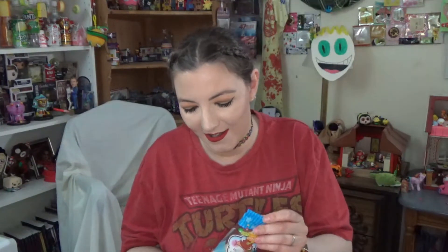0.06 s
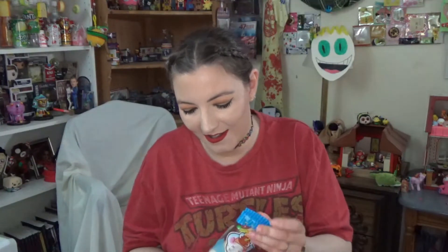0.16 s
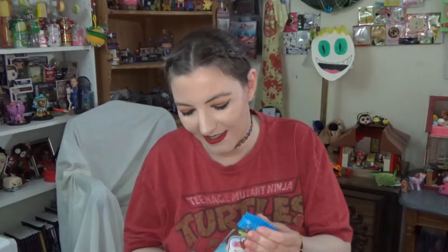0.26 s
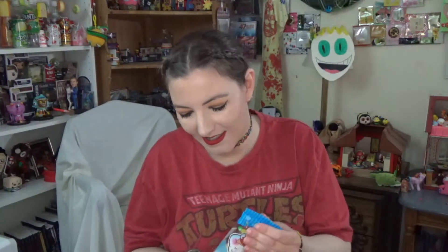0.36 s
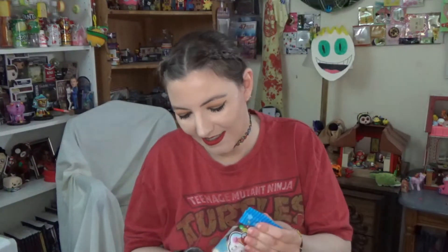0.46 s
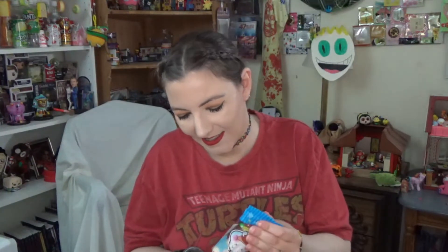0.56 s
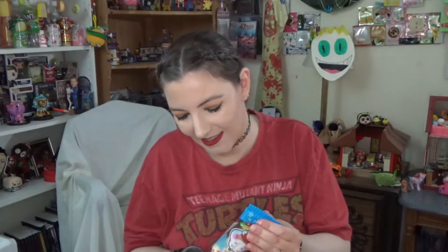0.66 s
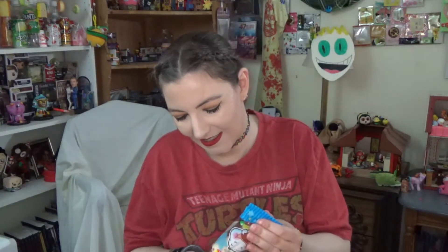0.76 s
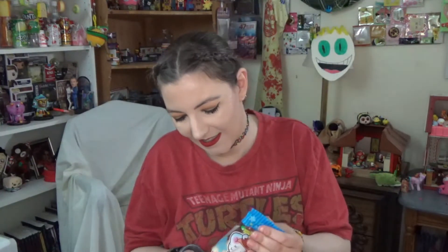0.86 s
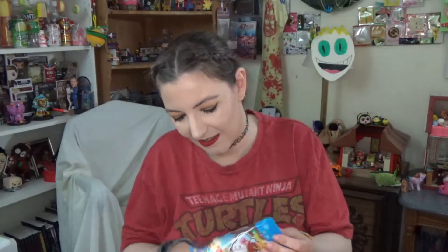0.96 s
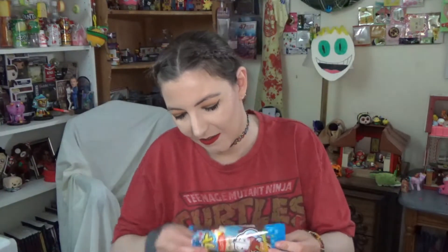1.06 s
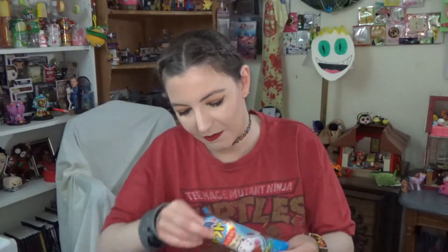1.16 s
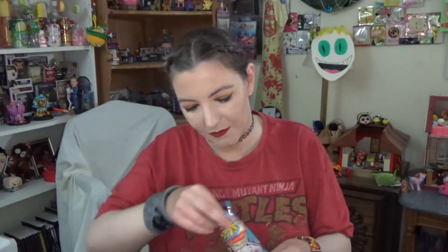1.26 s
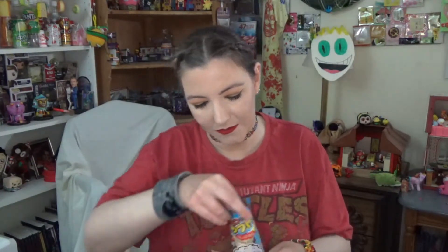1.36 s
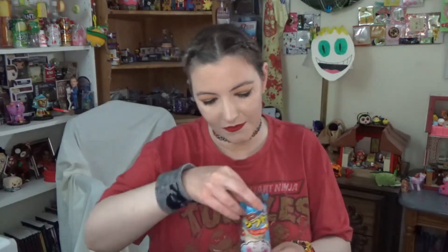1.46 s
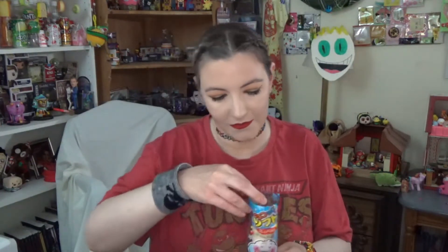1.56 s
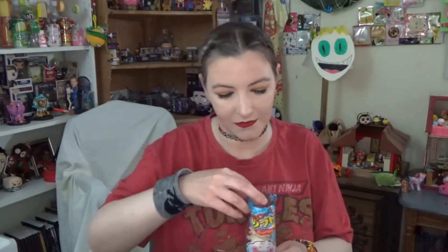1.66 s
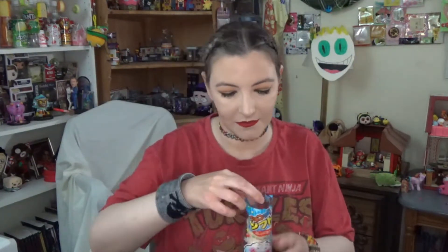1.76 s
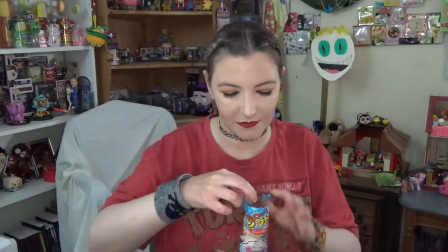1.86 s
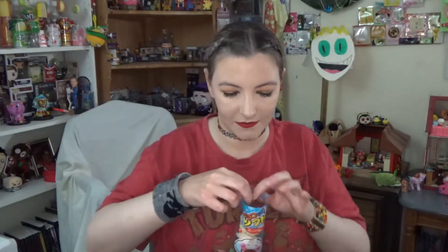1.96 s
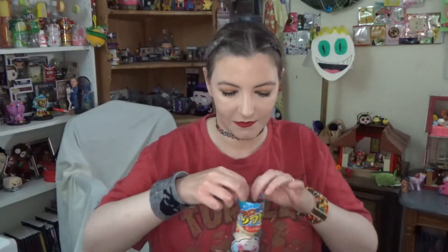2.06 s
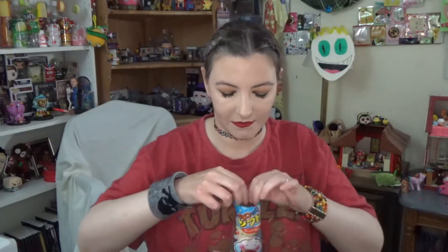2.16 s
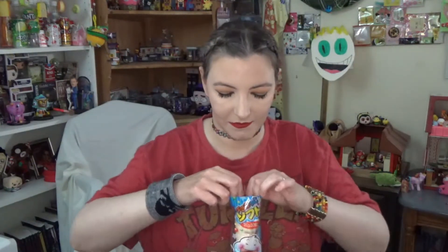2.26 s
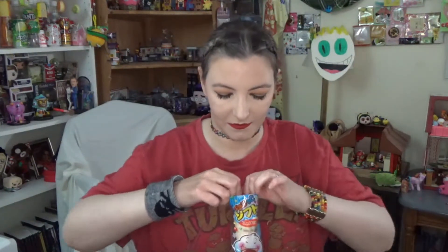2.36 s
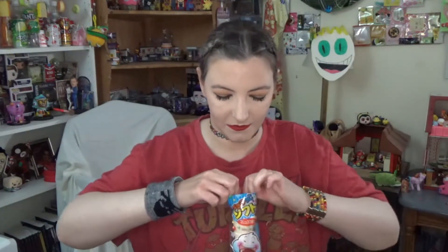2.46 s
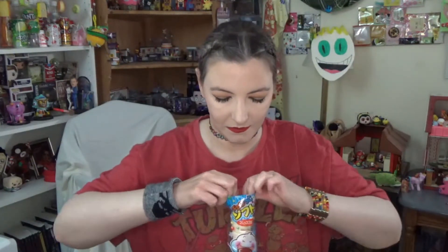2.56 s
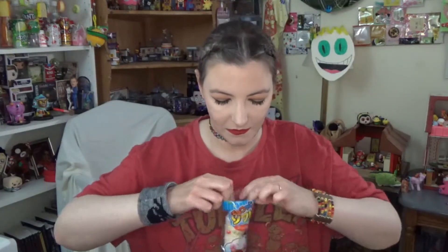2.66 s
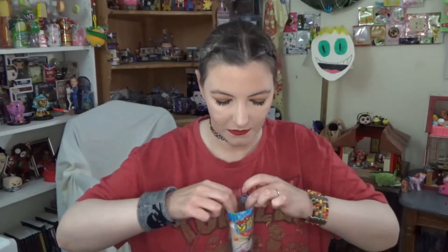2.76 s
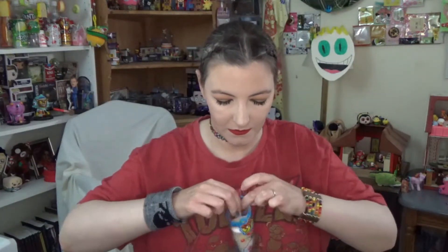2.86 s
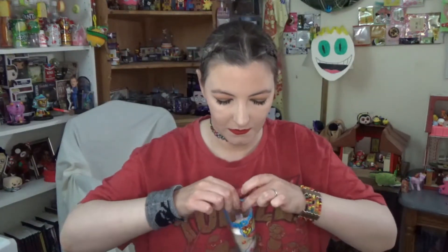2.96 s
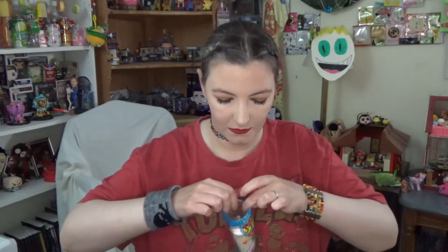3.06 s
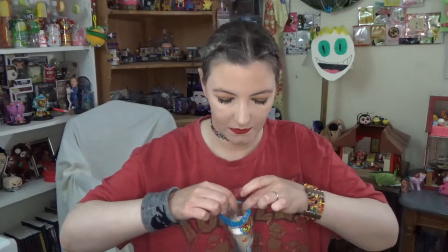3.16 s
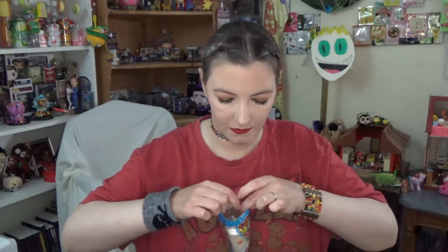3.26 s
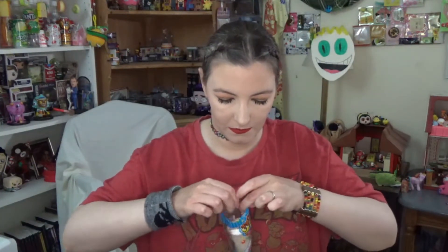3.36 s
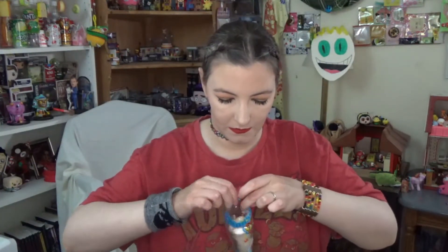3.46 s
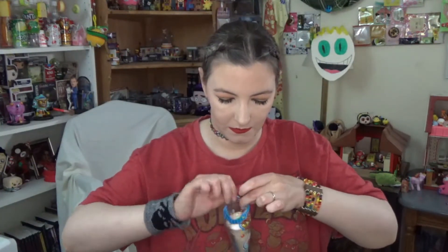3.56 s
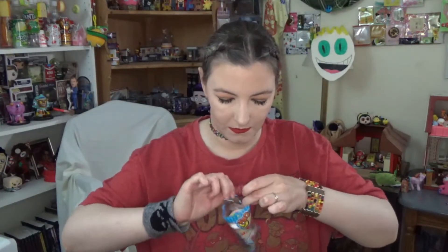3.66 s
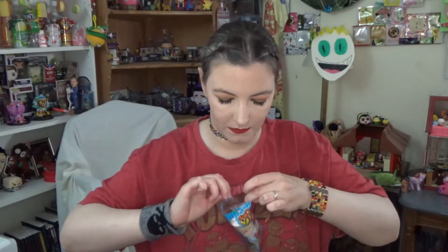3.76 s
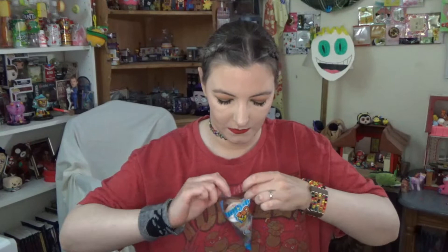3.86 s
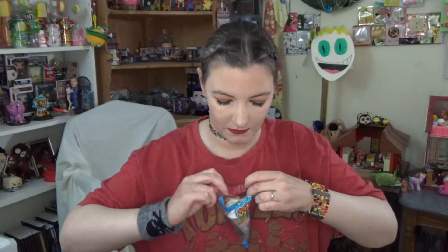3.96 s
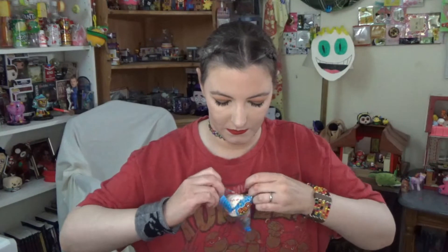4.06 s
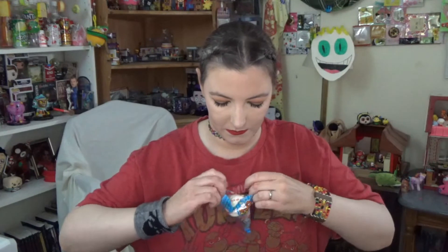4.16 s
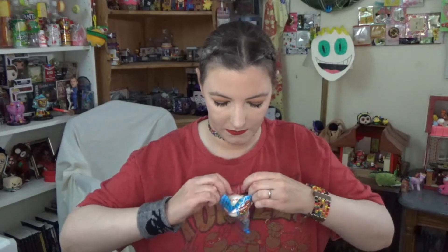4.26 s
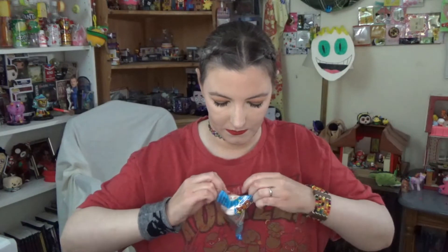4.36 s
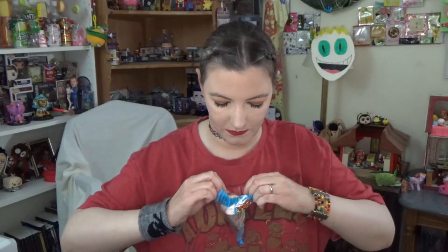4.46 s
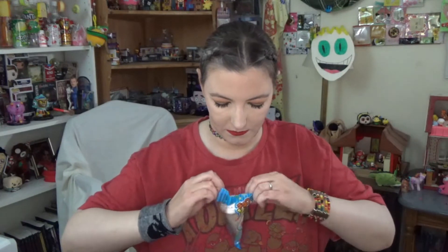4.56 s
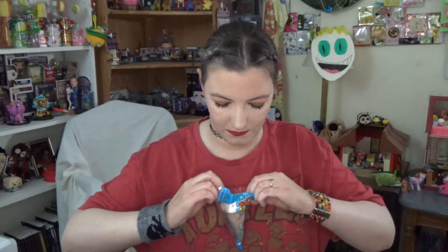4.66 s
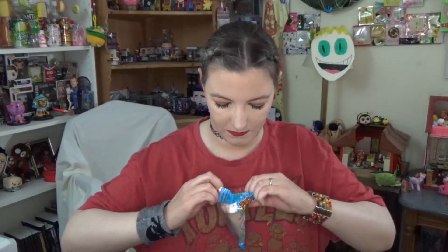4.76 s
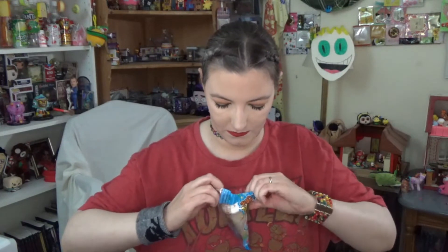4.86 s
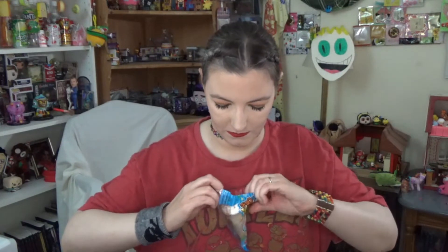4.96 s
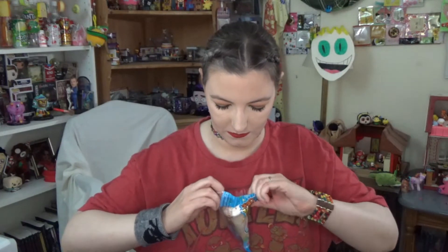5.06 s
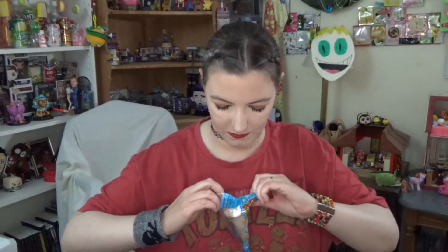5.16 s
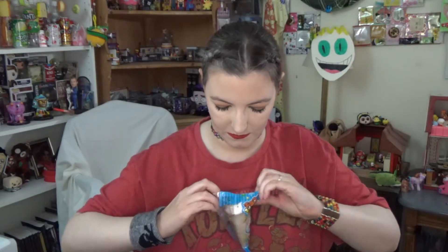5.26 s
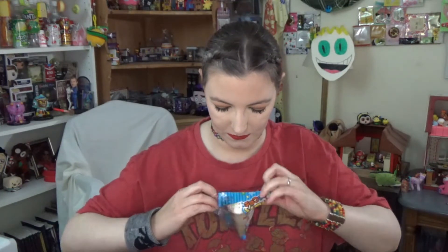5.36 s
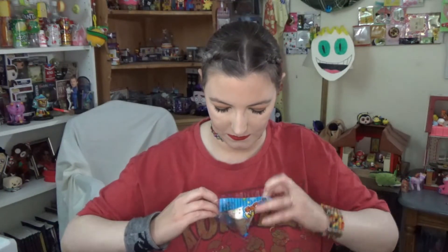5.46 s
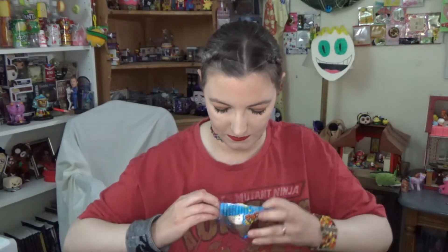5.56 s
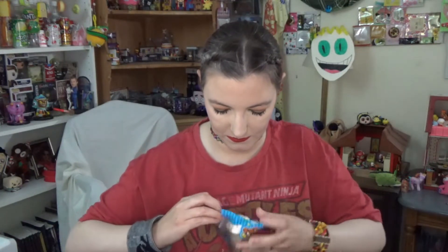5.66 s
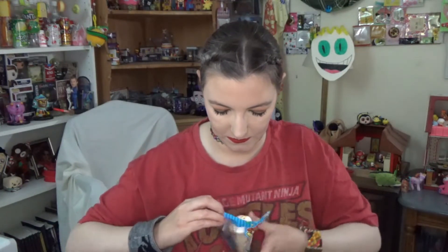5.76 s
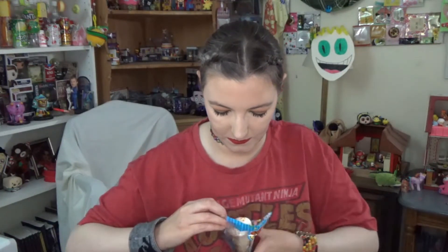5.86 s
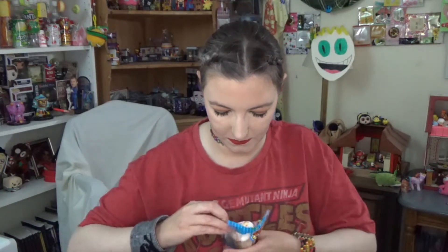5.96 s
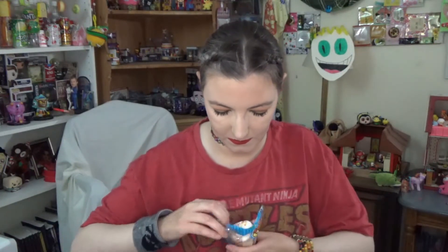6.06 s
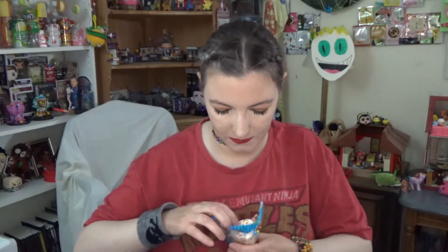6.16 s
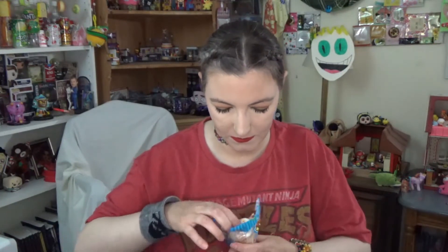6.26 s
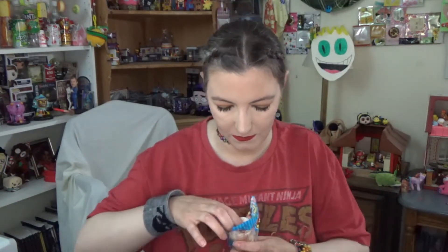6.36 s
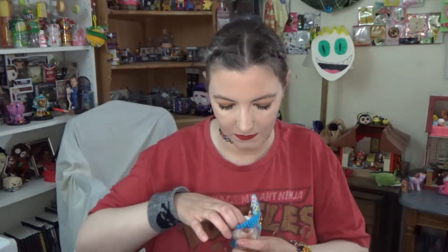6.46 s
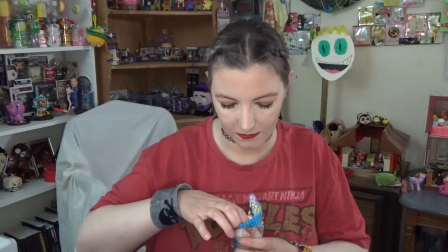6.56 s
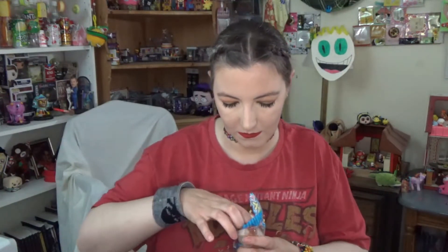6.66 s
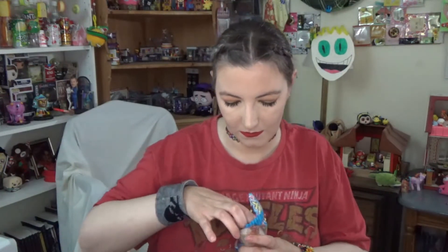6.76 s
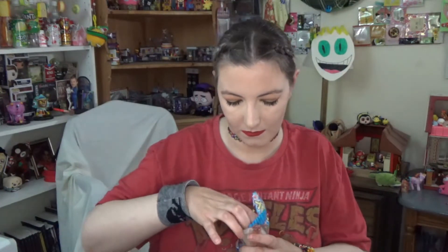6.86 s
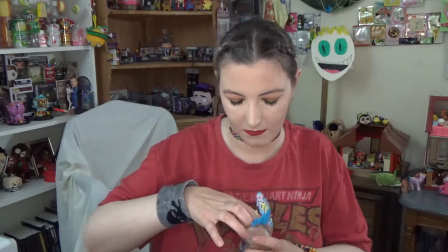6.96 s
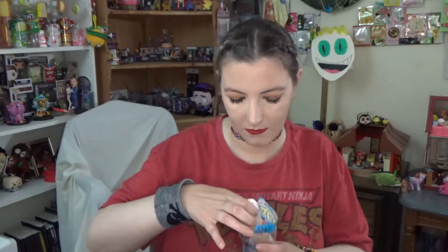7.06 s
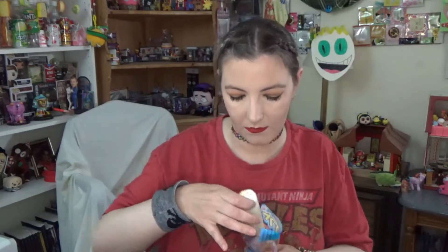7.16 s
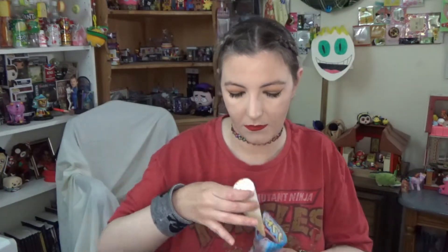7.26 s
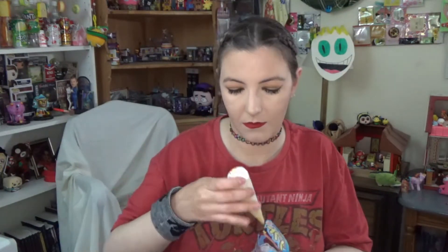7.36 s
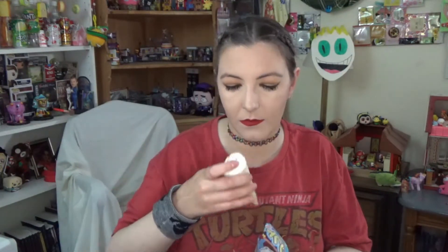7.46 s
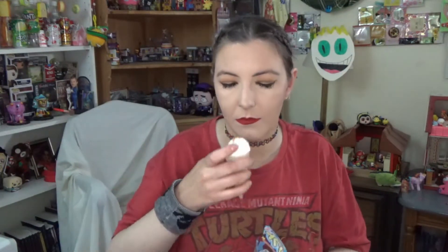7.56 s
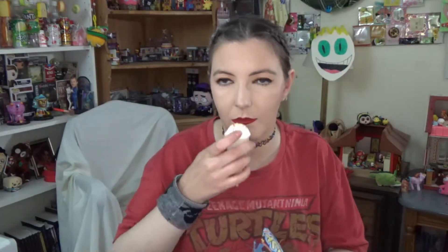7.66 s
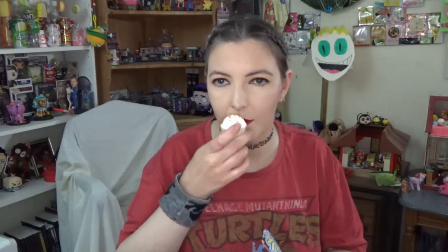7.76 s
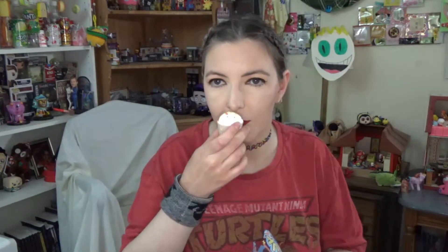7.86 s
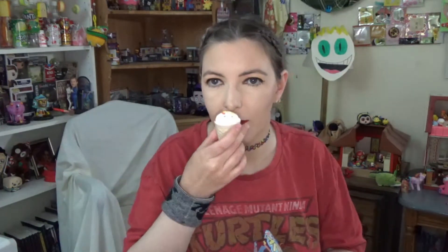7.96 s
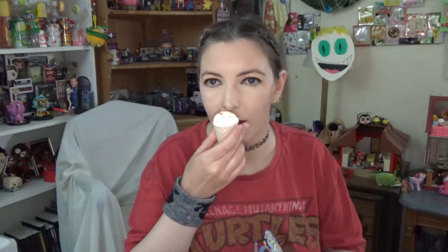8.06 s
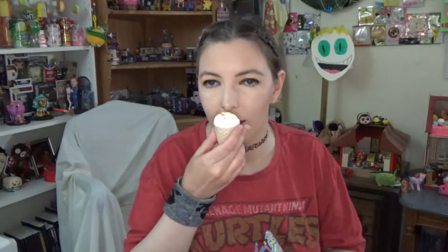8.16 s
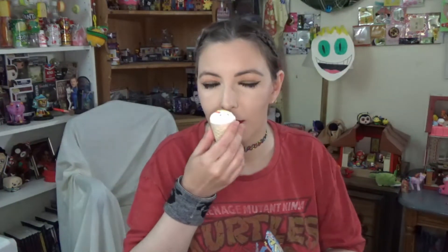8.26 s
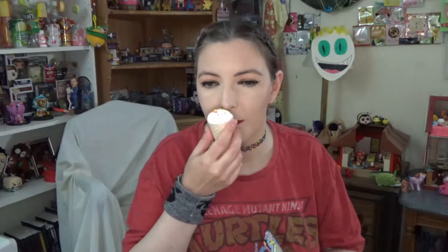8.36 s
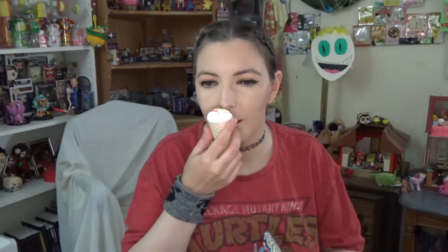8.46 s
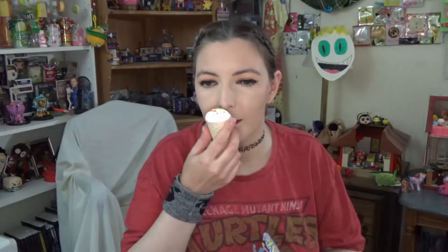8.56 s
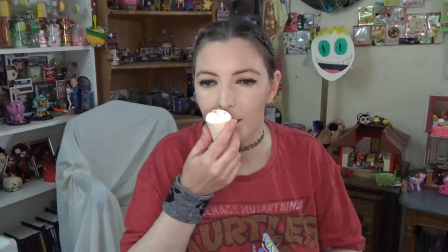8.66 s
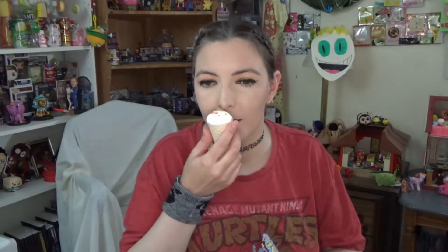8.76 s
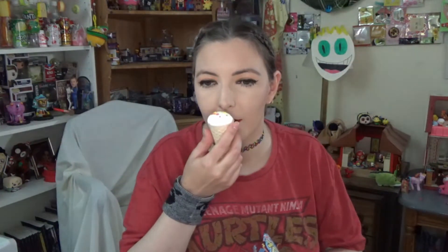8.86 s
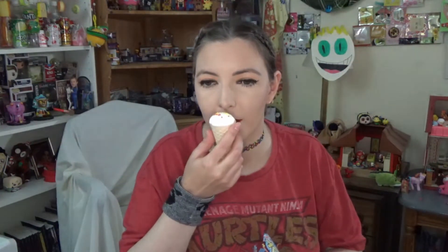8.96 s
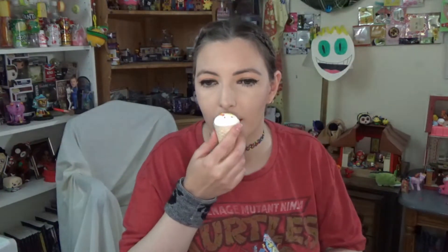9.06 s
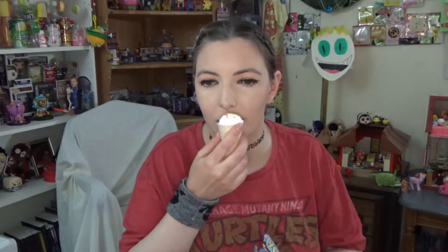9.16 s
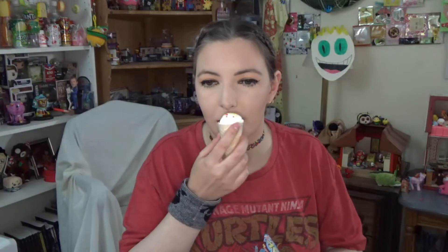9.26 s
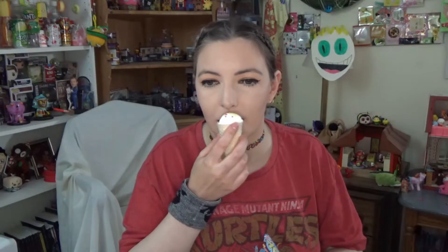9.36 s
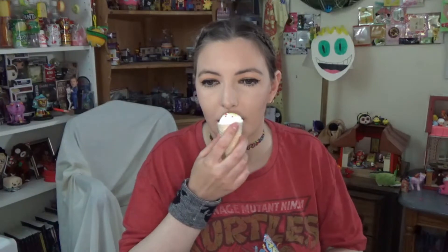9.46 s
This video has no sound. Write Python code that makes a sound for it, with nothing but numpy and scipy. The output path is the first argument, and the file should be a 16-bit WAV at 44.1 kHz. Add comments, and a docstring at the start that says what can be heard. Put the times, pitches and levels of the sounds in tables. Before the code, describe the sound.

Crisp plastic film crackles as a small snack packet is turned, pinched and peeled open. Short grips of rustle carry hard dry snaps, duller crumples and a few very soft low bumps. The tearing grows densest past the middle, pauses, crackles once more, then stops, leaving quiet room hiss with a few isolated ticks. Natural stereo, about a metre away, short indoor reflections.

```python
"""In a small furnished room, a thin plastic wrapper is turned, torn and peeled open about a metre from a camera.
Creases of the film flip with sharp snaps, made of noise puffs and fading tones, over a rustle of tiny tones.
The packet bumps softly now and then, as low fading tones. The walls answer with fading noise.
Faint room hiss (shaped noise) and mains hum (steady tones) lie under it all."""
import sys
import numpy as np
from scipy import signal
from scipy.fft import rfft, irfft, next_fast_len
from scipy.io import wavfile
from scipy.ndimage import map_coordinates

SR = 44100
rng = np.random.default_rng(int(sys.argv[2]) if len(sys.argv) > 2 else 0)


def field_ratio(decibels):
    """Amplitude ratio for a level in dB (20 dB per decade); scalars and array-likes work."""
    return 10 ** (np.asarray(decibels, dtype=float) / 20)


def transcribe(u):
    """Save the signal u as a 16-bit wav file named by the first command-line argument.

    u: samples, shape (n,) or (channels, n), limited to [-1, 1]; the rate is SR.
    q: integer samples, one column per channel.
    """
    v = np.clip(np.atleast_2d(u).T, -1, 1)
    q = np.round(v * 32767).astype(np.int16)
    wavfile.write(sys.argv[1], SR, q)


N = 419920  # length in samples


def unit(x):
    """Scaled to rms 1."""
    return x / np.sqrt(np.mean(x ** 2) + 1e-20)


def along(points, hz):
    """Reads a table of (Hz, value) points at any pitch, on a log pitch axis."""
    f, v = np.transpose(points)
    return np.interp(np.log(hz + 1), np.log(f + 1), v)


def filtered(x, response):
    """Makes each pitch in x stronger or weaker, as response(hz) says."""
    size = next_fast_len(x.shape[-1] + 8192)  # spare room for the filter to ring out
    spectrum = rfft(x, size) * response(np.fft.rfftfreq(size, 1 / SR))
    return irfft(spectrum, size)[..., :x.shape[-1]]


def paired(two, alike):
    """Blends two unrelated signals into a left and a right that are as alike as the table says."""
    def mid_and_side(hz):
        turn = np.arccos(np.clip(along(alike, hz), -1, 1)) / 2
        return np.array([np.cos(turn), np.sin(turn)])

    mid, side = filtered(two, mid_and_side)
    return np.array([mid + side, mid - side])


def placed(s, pieces):
    """Adds up short sounds, one per row, each starting at its own time s."""
    at = np.round(s * SR).astype(int)[:, None] + np.arange(pieces.shape[1])
    return np.bincount(at.ravel(), pieces.ravel(), N + SR)[:N]


def rings(s, gain, hz, cycles, size):
    """Fading sines that start at s and fall at 60 dB per given number of cycles, cut off after size samples."""
    turns = np.arange(size) * hz[:, None] / SR
    fade = field_ratio(-60 * turns / cycles[:, None])
    return placed(s, gain[:, None] * fade * np.sin(2 * np.pi * turns))


def bursts(s, gain, life, colour):
    """Dying puffs of noise that fall 19 dB per life, each with its own colour and a steady energy."""
    t = np.arange(512) / SR
    rise = 1 - np.exp(-t / (0.046 * life[:, None]))
    shape = field_ratio(-19 * t / life[:, None]) * rise
    noise = irfft(rfft(rng.standard_normal(shape.shape)) * colour(np.fft.rfftfreq(len(t), 1 / SR)))
    puff = shape * noise
    wanted = gain * np.linalg.norm(shape, axis=1)
    return placed(s, puff * (wanted / np.linalg.norm(puff, axis=1))[:, None])


# colour of the room hiss: f/Hz, level/dB (per Hz, relative)
HISS_COLOUR = [(15, -33), (25, -26.5), (60, -18), (115, -14), (240, -7.5), (570, -4), (1200, -5),
               (1900, -10), (2700, -7.5), (3400, -12), (4300, -9.5), (5200, -15), (11000, -16.5),
               (14300, -52)]
# how alike the hiss is at left and right: f/Hz, likeness (1 = the same)
HISS_ALIKE = [(100, 0.27), (500, 0.33), (1500, 0.85), (4000, 1), (10000, 0.7)]
# tones of the mains hum: f/Hz, level/dB (rms)
HUM_TONES = [(60, -100), (120, -91)]
HISS_DB = -63.5  # rms


def air():
    """Steady room hiss is shaped noise; mains hum is a few steady sines."""
    noise = filtered(rng.standard_normal((2, N)), lambda hz: field_ratio(along(HISS_COLOUR, hz)))
    hiss = field_ratio(HISS_DB) * unit(paired(noise, HISS_ALIKE))
    t = np.arange(N) / SR
    hum = sum(field_ratio(db) * np.sqrt(2) * np.sin(2 * np.pi * hz * t) for hz, db in HUM_TONES)
    return hiss + hum


# the fingers work the film in grips: start t/s, hold t/s, rustle level/dB, body level/dB (above the rustle)
FINGER_GRIPS = [(0, 0.28, -50.5, -1.5), (0.244, 0.075, -36.5, -5), (0.367, 0.054, -44.5, 2),
                (0.484, 0.061, -40, -2.5), (0.592, 0.056, -47.5, -2.5), (0.725, 0.39, -72, 7),
                (1, .03, -54, -10), (1.028, 0.1, -41, -4.5), (1.156, 0.15, -48.5, 1.5),
                (1.35, 0.2, -52, -3), (1.442, 0.17, -48.5, 2.5), (1.616, 0.22, -57.5, -1),
                (1.817, 0.061, -46.5, 2), (2.015, 0.024, -44, -5.5), (2.034, 0.017, -35, 0.5),
                (2.138, 0.15, -50.5, 0), (2.313, 0.13, -44, -4), (2.663, 0.078, -40.5, -9.5),
                (2.815, .04, -46, 12), (2.879, 0.033, -49, 6), (2.966, 0.13, -59, 5),
                (3.038, 0.24, -52, -3), (3.241, 0.24, -49.5, 1), (3.464, 0.16, -68.5, 9),
                (3.621, 0.022, -46, -11), (3.749, 0.13, -45.5, 5), (3.908, 0.24, -40.5, -5),
                (4.062, 0.15, -36, -4), (4.215, 0.12, -59, 6.5), (4.371, .13, -48, -0.5),
                (4.547, 0.055, -49.5, -1.5), (4.638, 0.046, -39, -7), (4.715, 0.18, -51, 1.5),
                (4.955, 0.029, -48.5, 6), (4.981, 0.037, -38.5, -4), (5.097, 0.11, -56.5, 7.5),
                (5.23, 0.14, -52.5, -0.5), (5.325, 0.094, -32, -4.5), (5.447, .13, -40, -1),
                (5.681, 0.036, -36, -4), (5.732, 0.1, -43.5, -1), (5.88, 0.072, -48.5, 2),
                (6.005, 0.048, -40, -1.5), (6.102, 0.045, -38, -5.5), (6.187, 0.054, -42, 0.5),
                (6.253, 0.061, -35.5, -9.5), (6.356, 0.12, -56, 1), (6.5, .1, -66, 1.5),
                (6.59, 0.039, -60, 2.5), (6.653, 0.2, -53, 3.5), (6.909, .12, -55, 1),
                (7.031, 0.39, -41.5, -3), (7.244, 0.077, -40.5, 2.5), (7.391, 0.1, -59.5, -1),
                (7.514, 0.23, -66, -4.5), (7.68, 0.12, -62, 1), (7.854, 0.062, -66, -9),
                (8.037, 0.14, -64, 2), (8.758, 0.011, -59, -1), (9.1, 0.012, -50, -6.5)]
GRIP_ATTACK_S = 0.0059
GRIP_SAG_DB_PER_S, GRIP_FADE_DB_PER_S = 20.5, 347  # sag from the start on; fade is added after the hold


def handling(t):
    """Gain of the fizz and of the crumple: each grip rises fast, sags a little and then fades."""
    start, hold, level_db, body_db = np.transpose(FINGER_GRIPS)[:, :, None]
    rise = np.clip((t - start) / GRIP_ATTACK_S, 0, 1)
    sag_db = GRIP_SAG_DB_PER_S * np.clip(t - start, 0, None)
    fade_db = GRIP_FADE_DB_PER_S * np.clip(t - start - hold, 0, None)
    fizz = rise * field_ratio(level_db - sag_db - fade_db)
    crumple = fizz * field_ratio(body_db)
    return np.sqrt([np.sum(fizz ** 2, axis=0), np.sum(crumple ** 2, axis=0)])


def grains(count, spectrum, centre_hz, spread, cycles, size_db):
    """A dense patter of tiny flips of many sizes, in clumps, each flip a very short tone."""
    draw = rng.random((count, 3))
    s = draw[:, 0] * N / SR
    fold = map_coordinates(rng.standard_normal(400), [s * 40])  # the folds shift the pitch
    hz = np.clip(centre_hz * np.exp(spread * (rng.standard_normal(count) + fold)), 150, 11000)
    clumps = map_coordinates(rng.standard_normal(1500), [s * 150])
    gain = field_ratio(-size_db * np.log(draw[:, 1] + .01)) * field_ratio(np.clip(5.0 * clumps, -9, 6))
    patter = rings(s, gain, hz, cycles * (.5 + draw[:, 2]), size=130)

    # divide out the patter's own colour, then give it the wanted one
    own = np.sqrt(signal.welch(patter, SR, nperseg=256)[1] + 1e-12)
    own_hz = np.fft.rfftfreq(256, 1 / SR)
    return unit(filtered(patter, lambda hz: field_ratio(along(spectrum, hz)) / np.interp(hz, own_hz, own)))


# colour of the film's crackle, also used by the snaps: f/Hz, level/dB (per Hz, relative)
FILM_COLOUR = [(880, -37), (1500, -27.5), (2740, 4.5), (4220, 8), (5300, 4), (9680, 8), (10500, 7),
               (13600, -9.5), (22000, -120)]
# colour of the packet's body, also used by the snaps: f/Hz, level/dB (per Hz, relative)
BAG_COLOUR = [(88, -76), (150, -51), (338, -16.5), (413, -12), (588, -10.5), (735, -2.5), (1640, -1),
              (2500, 0), (3250, -6), (5500, -120)]


def rustle():
    """Fingers work the film: bright fizz of small creases and a duller crumple of the bag."""
    fizz = grains(count=30000, spectrum=FILM_COLOUR, centre_hz=5500, spread=.4, cycles=9, size_db=3)
    crumple = grains(count=14000, spectrum=BAG_COLOUR, centre_hz=1150, spread=.36, cycles=7, size_db=2.5)
    coarse = np.arange(0, N / SR + .002, .002)  # gains every 2 ms, joined by straight lines
    t = np.arange(N) / SR
    fizz_gain, crumple_gain = (np.interp(t, coarse, gain) for gain in handling(coarse))
    return fizz_gain * fizz + crumple_gain * crumple


# the clearest creases that flip: t/s, crack level/dB, crack f/Hz, pop level/dB (above the crack), pop f/Hz
CLEAR_SNAPS = [(0.0549, -27, 3250, -4, 2280), (0.0923, -21, 4510, -12.5, 1130),
               (0.1518, -12, 7500, -11, 2220), (0.2498, -14.5, 8900, -12.5, 1340),
               (0.2688, -21, 4740, -8, 1340), (0.2749, -9, 8200, -18.5, 1550),
               (0.2914, -11, 2930, -20, 1410), (0.4084, -31, 3460, 1, 1330),
               (0.4586, -24, 5700, -7.5, 1100), (0.491, -14, 10000, -33, 1540),
               (0.4961, -4.5, 9530, -20.5, 2210), (0.609, -23, 10100, -12, 2240),
               (0.6309, -23.5, 3450, -2, 2200), (0.6449, -14.5, 5400, -12, 1330),
               (0.6507, -22.5, 6000, -31, 1350), (0.7924, -43.5, 3550, 5, 1320),
               (0.8406, -42, 2610, -3.5, 2410), (0.902, -35, 10300, -13, 1960),
               (0.914, -45, 3420, 3.5, 896), (1.038, -11.5, 9140, -8.5, 1850),
               (1.054, -7, 9230, -12.5, 1990), (1.0784, -13, 4020, -19, 1870),
               (1.1025, -17, 10300, -20, 1550), (1.1451, -10, 9500, -22, 1860),
               (1.183, -10, 9600, -13, 1420), (1.263, -20, 6760, -8.5, 2300),
               (1.3121, -23.5, 9900, -16, 1190), (1.4456, -28.5, 4100, 1.5, 1190),
               (1.507, -15, 4190, -23, 2500), (1.5198, -14.5, 9400, -18.5, 1180),
               (1.5745, -46.5, 4430, 10, 1030), (1.6883, -32, 9070, -7.5, 1180),
               (1.8412, -23.5, 4300, -7, 1010), (1.8658, -16.5, 4230, -29, 2320),
               (1.8905, -20, 9970, -6.5, 2240), (2.0408, -8, 8630, -24, 2310),
               (2.1472, -17.5, 6200, -15.5, 1020), (2.2604, -26.5, 3520, -1.5, 1340),
               (2.3206, -17, 4760, -13.5, 1980), (2.361, -20.5, 9500, -13, 1820),
               (2.3923, -37, 2560, 11, 1430), (2.4274, -21, 6130, -10, 1740),
               (2.6627, -25.5, 6720, -12, 1520), (2.6793, -20.5, 8590, -15, 1040),
               (2.7362, -16.5, 10200, -20, 1190), (2.823, -12.5, 6100, -13, 1020),
               (2.8684, -28.5, 8840, -18, 1010), (2.8878, -8, 6320, -47, 1350),
               (2.9134, -20.5, 4350, -9, 1340), (2.944, -24.5, 6260, -17, 1100),
               (2.9771, -41, 4570, 8.5, 2120), (3.0729, -21.5, 4300, -13, 2190),
               (3.0854, -20.5, 8900, -10.5, 1180), (3.1305, -24.5, 9900, -20, 1330),
               (3.2322, -20, 9430, -13, 2170), (3.254, -4, 8260, -24.5, 2220),
               (3.3523, -16.5, 10500, -10.5, 2200), (3.4123, -29, 7540, -12, 2210),
               (3.4326, -19.5, 9200, -11, 1380), (3.4416, -19.5, 9260, -11.5, 2220),
               (3.485, -33, 3940, -6, 2130), (3.5604, -54, 4190, 10, 996), (3.6196, -12.5, 8660, -28, 1420),
               (3.763, -13, 10200, -42.5, 1240), (3.7698, -11.5, 6700, -17, 1330),
               (3.7885, -6.5, 6750, -23, 2180), (3.8194, -6.5, 4560, -14, 2500),
               (3.8362, -17.5, 5880, -16, 2500), (3.8647, -9, 9400, -19, 1010),
               (3.9309, -9, 4100, -14, 1020), (3.9598, -6, 8120, -43, 1390), (4.089, -17, 10080, -7, 2200),
               (4.1046, -10.5, 8200, -13, 1580), (4.1354, -13.5, 9300, -10, 1440),
               (4.148, -13, 8900, -10, 2280), (4.1809, -17.5, 7900, -28, 1410),
               (4.2154, -31, 3150, -22, 1760), (4.3146, -25, 4370, -15, 1360),
               (4.4199, -19, 4000, -17, 1360), (4.4638, -8.5, 7220, -23, 2460),
               (4.574, -13, 3970, -19, 2490), (4.6507, -19.5, 9200, -17, 1160),
               (4.725, -21, 4200, -9.5, 1200), (4.7664, -22, 2500, -19, 2490),
               (4.8086, -4.5, 6650, -23, 2400), (4.8682, -19.5, 3000, -19.5, 1020),
               (4.9695, -13, 9600, -27, 1210), (4.9817, -3, 9040, -20, 1420), (5.1064, -22, 4430, -25, 915),
               (5.112, -13.5, 9190, -28, 2170), (5.118, -19, 6150, -22, 2230),
               (5.1264, -7, 8450, -43, 2490), (5.1474, -8.5, 5950, -22.5, 1090),
               (5.3386, -21.5, 9340, -22.5, 1350), (5.3447, -8.5, 3990, -19, 1670),
               (5.3862, -9.5, 9730, -21, 1280), (5.3906, -13, 9930, -20, 1660),
               (5.4252, -12, 4160, -20, 754), (5.4565, -14.5, 9450, -9, 1640),
               (5.5051, -12, 6360, -12.5, 1000), (5.5182, -12.5, 3550, -23.5, 1250),
               (5.5696, -20, 4070, -14, 1030), (5.6509, -18.5, 4800, -18, 1640),
               (5.66, -17, 4500, -18, 1580), (5.687, -3.5, 9770, -26, 2360),
               (5.7274, -8.5, 4400, -26, 1580), (5.7517, -6.5, 4870, -49, 2070),
               (5.7718, -15, 4370, -26, 1530), (5.8132, -7.5, 9040, -22.5, 754),
               (5.897, -14, 9600, -15, 2470), (5.9614, -23, 4105, -35, 1640),
               (6.0243, -18, 3130, -14, 1110), (6.042, -19.5, 4360, -18, 1290),
               (6.0818, -8.5, 9480, -23, 1730), (6.1, -4.5, 7700, -30, 1500), (6.116, -13, 4700, -26, 1700),
               (6.1874, -16, 9600, -26, 1640), (6.2342, -28.5, 2870, -0.5, 1780),
               (6.2581, -9.5, 8470, -9, 1660), (6.2869, -6.5, 7600, -49, 1210),
               (6.4076, -62, 2990, 18.5, 1560), (6.6663, -33, 4400, -0.5, 1340),
               (6.7231, -9, 9900, -17.5, 2370), (6.7915, -27.5, 4340, -12, 2220),
               (6.9147, -30, 4500, -26, 1120), (6.9972, -17.5, 7360, -15.5, 2470),
               (7.0519, -41.5, 5540, -14, 1120), (7.0904, -29.5, 8680, -13.5, 1110),
               (7.1033, -22, 3090, -4.5, 1180), (7.1412, -22, 6080, -7.5, 1550),
               (7.2405, -42, 4450, 9, 1100), (7.2653, -5.5, 9700, -27, 1550),
               (7.2825, -4.5, 7570, -33, 1200), (7.3309, -13.5, 6550, -33, 1280),
               (7.4606, -26.5, 9900, -9, 1670), (7.7562, -34, 9700, -18, 711),
               (7.894, -49, 7670, 0.5, 1390), (8.075, -43.5, 7660, -17, 1190),
               (8.1005, -33.5, 7700, -22, 673), (8.1163, -39, 7340, -18, 1270),
               (8.1374, -32, 9360, -31, 1680), (8.751, -16, 9720, -19.5, 1650),
               (8.967, -48, 9600, -20, 947), (9.104, -43, 2610, -4, 1940), (9.3568, -53.5, 2740, 2, 1350)]
# length of a flip at that level; harder ones are shorter (dB of length per dB); random log scatter
FLIP_MS, FLIP_AT_DB, FLIP_SHORTENS, FLIP_SCATTER = 2.6, -15, .15, .15
LESSER_PER_S = 80  # smaller creases flip at random
LESSER_DB, LESSER_SPREAD_DB = 13.5, 3.5  # crack above the fizz
LESSER_POP_DB, LESSER_POP_SPREAD_DB = -11.5, 8.5  # pop above the crack, on top of the grip's body level
LESSER_CRACK_HZ, LESSER_POP_HZ = (3040, 10500), (903, 2400)  # lowest, highest


def flips():
    """The clear snaps and a random crowd of lesser ones whose size follows the grip, with a length for each."""
    draw = rng.random((round(LESSER_PER_S * N / SR), 5))
    s = draw[:, 0] * N / SR
    between = lambda ends, share: ends[0] * (ends[1] / ends[0]) ** share
    fizz_db, crumple_db = 20 * np.log10(handling(s) + 1e-9)
    db = fizz_db + LESSER_DB - LESSER_SPREAD_DB * np.log(draw[:, 1] + .2)
    body_db = crumple_db - fizz_db
    pop_db = body_db + LESSER_POP_DB + LESSER_POP_SPREAD_DB * (2 * draw[:, 2] - 1)
    lesser = [s, db, between(LESSER_CRACK_HZ, draw[:, 3]), pop_db, between(LESSER_POP_HZ, draw[:, 4])]
    rows = np.hstack([np.transpose(CLEAR_SNAPS), lesser])
    scatter = np.exp(FLIP_SCATTER * rng.standard_normal(len(rows[1])))
    ms = FLIP_MS * field_ratio(FLIP_SHORTENS * (FLIP_AT_DB - rows[1])) * scatter
    return np.vstack([rows, ms])


def thin(hz):
    """So small a sheet radiates almost no bass."""
    return (1j * hz / (330 + 1j * hz)) ** 3


def snaps(rows, brief):
    """Each flip is a crack that leans towards one pitch, and a lower pop of the panel around it."""
    s, db, crack_hz, pop_db, pop_hz, ms = rows
    luck = rng.standard_normal(len(s))
    life = np.clip(ms, .5, 9) * brief / 1000
    gain = field_ratio(db) / np.sqrt(brief)  # a briefer crack keeps its energy

    def lean(hz, centre_hz, width):
        return np.exp(-(np.log((hz + 1) / centre_hz[:, None]) / width) ** 2)

    crack_colour = lambda hz: field_ratio(along(FILM_COLOUR, hz)) * (field_ratio(-9) + lean(hz, crack_hz, .45))
    thud_colour = lambda hz: field_ratio(along(BAG_COLOUR, hz)) * lean(hz, pop_hz, 0.34)
    broad = bursts(s, gain * field_ratio(-4), life, crack_colour)
    crack = rings(s, gain * field_ratio(-11), crack_hz, 4 * life * crack_hz, size=500)
    pop = rings(s, field_ratio(db + pop_db + 5), pop_hz, 12 * np.exp(.25 * luck), size=1000)
    thud = bursts(s, gain * field_ratio(pop_db - 4.5), 3.2 * life, thud_colour)
    return filtered(broad + crack + pop + thud, thin)


# how long the walls ring at each pitch: f/Hz, t/s (to fall 60 dB)
WALL_RING = [(300, 0.17), (1500, 0.21), (5000, 0.26), (10000, 0.2)]
# how alike the walls sound at left and right: f/Hz, likeness (1 = the same)
WALL_ALIKE = [(200, 0.13), (1000, .6), (3000, 0.35), (10000, 0.61)]


def walls(x):
    """Echoes as a noise tail dying by frequency, weaker at first, freshly drawn every quarter second."""
    step, length = SR // 4, SR // 2  # each tail lasts half a second
    out = np.zeros((2, N + step + length))
    t = np.arange(length) / SR
    onset = np.clip(0.65 + np.clip((t - .005) / 0.012, 0, 1), 0, 1)  # reaches full strength by 9.2 ms
    for a in range(0, N, step):
        hz, when, z = signal.stft(rng.standard_normal((2, length)), SR, nperseg=128)
        fading = z * field_ratio(-60 * when / along(WALL_RING, hz)[:, None])
        tail = signal.istft(fading, SR, nperseg=128)[1][:, :length] * onset
        wet = signal.fftconvolve(x[None, a:a + step], tail / np.linalg.norm(tail[0]), axes=1)
        out[:, a:a + wet.shape[1]] += wet
    return paired(out[:, :N], WALL_ALIKE)


# packet against hands: t/s, level/dB, f/Hz
PACKET_BUMPS = [(0.628, -50, 220), (1.044, -49.5, 153), (5.339, -42, 250), (5.717, -45.5, 246),
                (7.301, -58, 200)]


def bumps():
    """Soft low thuds of the packet, each a sine that dies within about five cycles."""
    s, db, hz = np.transpose(PACKET_BUMPS)
    return rings(s, field_ratio(db), hz, np.full(len(s), 5.0), size=4000)


def scene():
    """The wrapper sits a little to the right; the walls hear each flip from other sides, as a plainer click."""
    room = air()
    soft, rows = rustle() + bumps(), flips()
    near = snaps(rows, brief=1) + soft
    around = snaps(rows, brief=.25) + soft
    left_right = field_ratio([[-.5], [.5]])
    return near * left_right + field_ratio(-3.5) * walls(around) + room


# steep treble cut above 11 kHz: f/Hz, level/dB
TREBLE_CUT = [(11000, 0), (11200, -25), (12000, -33), (13000, -41), (16000, -61), (17000, -90)]


def without_top(x):
    """The treble is cut steeply above 11 kHz."""
    return filtered(x, lambda hz: field_ratio(along(TREBLE_CUT, hz)))


def top_cut(x):
    """Nothing passes above the cut-off."""
    return signal.sosfilt(signal.butter(12, 12370, fs=SR, output="sos"), x)


def record(dry):
    """Turns the scene into the finished sound, with its top treble cut away."""
    mix = without_top(dry)
    return top_cut(mix)


dry = scene()
out = record(dry)
transcribe(out)
```